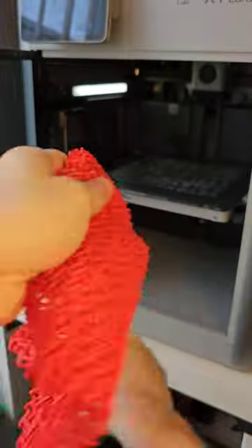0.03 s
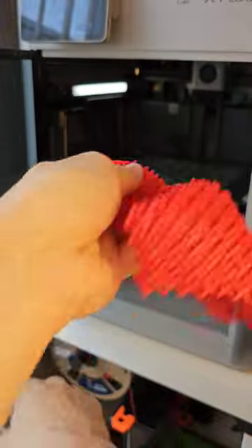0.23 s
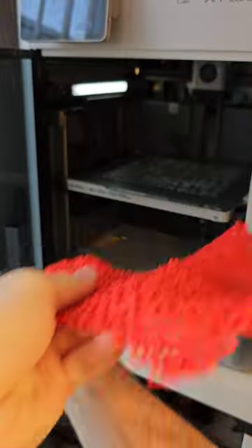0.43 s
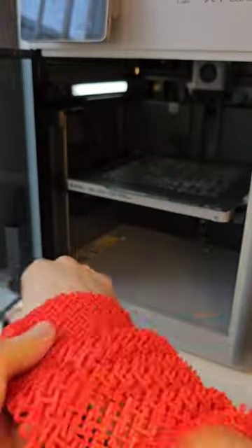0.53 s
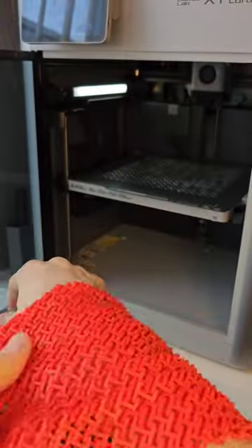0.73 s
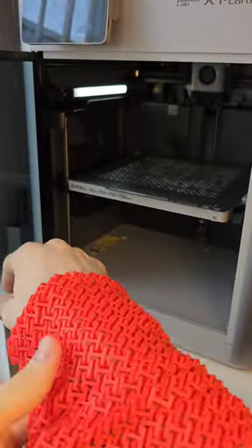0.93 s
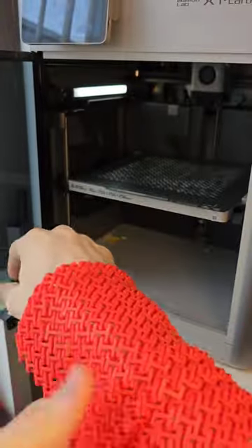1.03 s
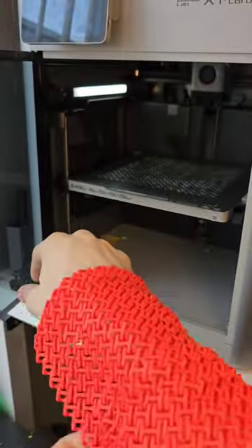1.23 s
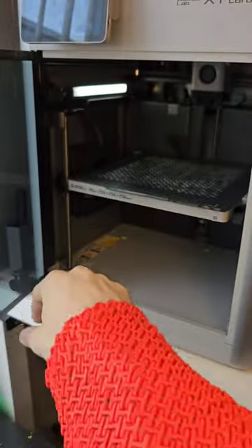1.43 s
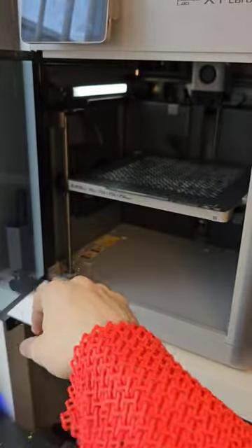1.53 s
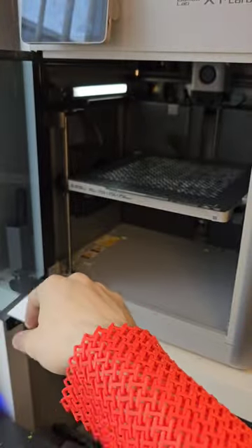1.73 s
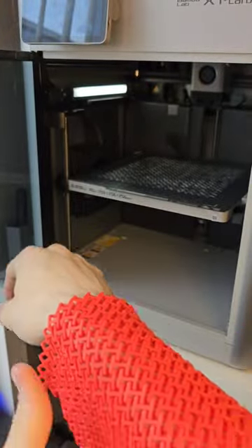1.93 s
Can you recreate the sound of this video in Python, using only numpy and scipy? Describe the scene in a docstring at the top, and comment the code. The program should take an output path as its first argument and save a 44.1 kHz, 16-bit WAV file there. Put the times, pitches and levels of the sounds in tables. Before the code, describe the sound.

A sheet of plastic chainmail rustles close to a stereo microphone, hundreds of tiny links clicking. It peaks in hard snaps, lulls, then returns in softer swishes and a last bright flick. A machine hums faintly in the small room.

```python
"""A sheet of plastic chainmail is lifted, tossed over a forearm and smoothed down, close to a stereo mic.
From the start, each move sets hundreds of small links clicking; now and then a few catch and snap free.
The rustle peaks in hard snaps near 0.6 s, lulls, then returns in softer swishes over dull arm rubs.
A last bright flick at 1.7 s dies away into the machine that hums faintly in the small room throughout."""
import sys
import numpy as np
from scipy import signal
from scipy.fft import rfft, irfft
from scipy.io import wavfile
from scipy.ndimage import map_coordinates

SR = 44100
rng = np.random.default_rng(int(sys.argv[2]) if len(sys.argv) > 2 else 0)


def digitize_waveform(pressure):
    """Quantize a signal to 16-bit integers and store it at the path in sys.argv[1].

    Rows of a 2-D input are taken as channels; values are limited to [-1, 1].
    """
    field = np.atleast_2d(pressure).T
    bounded = np.clip(field, -1, 1)
    quanta = np.round(bounded * 32767).astype(np.int16)
    wavfile.write(sys.argv[1], SR, quanta)


N = 88200

# tone colour of the fan's air: f/Hz, relative level/dB
FAN_COLOUR = [(20, -11.5), (45, -0.5), (75, -4), (110, -8), (200, 1.5), (320, -5.5), (480, -5), (680, -7),
              (900, -12), (1800, -18), (4000, -28.5), (8000, -26.5), (15000, -12)]
# how centred the air sounds: f/Hz, left-right correlation
FAN_CORRELATION = [(30, 0.65), (180, 0.87), (350, 0.9), (700, 0.12), (2000, 0.01), (15000, 0.22)]
# the machine's weaker tones: f/Hz, level/dB
MOTOR_TONES = [(80.7, -70), (118.4, -74.5), (226.1, -72.5), (409.1, -76), (511.4, -80), (694.4, -76)]
# level ride of the machine's main tone: t/s, level/dB
DRONE_RIDE = [(0.0, -68), (0.06, -80.5), (0.13, -77), (0.39, -60), (0.64, -61.5), (0.76, -73), (0.96, -60),
              (1.16, -69), (1.39, -59.5), (1.5, -69), (1.79, -59.5), (2.0, -60.5)]
# reverb time of the small room: f/Hz, T60/s
ROOM_DECAY = [(300, 0.23), (3000, 0.12), (8000, 0.2), (15000, 0.079)]
# echoes off nearby surfaces, relative to the direct sound: delay/s, left/dB, right/dB
EARLY_ECHOES = [(.0018, -10, -1), (.0031, -9, -11), (.0046, -2.5, -9.5)]
# soft rubs of the arm: peak t/s, half-width/s, level/dB, centre f/Hz
ARM_RUBS = [(.1, 0.044, -67.5, 238), (.335, 0.028, -83, 65), (0.924, 0.026, -61, 244),
            (1.004, 0.011, -56, 220), (1.075, 0.014, -70, 215), (1.15, .02, -62.5, 220),
            (1.262, 0.016, -59.5, 219), (1.52, 0.015, -65, 230), (1.65, 0.081, -63, 49.6),
            (1.98, 0.035, -58, 234)]
# tone of the clicks through the microphone, with its two high resonant peaks: f/Hz, left/dB, right/dB
CLICK_COLOUR = [(200, -45, -45), (800, -36, -36), (1300, -29, -29), (1800, -28.5, -27.5),
                (2200, -25, -22.5), (3000, -24, -20.5), (4200, -23, -21.5), (5100, -23, -26.5),
                (6600, -16.5, -17.5), (9300, -12, -21), (10400, -15.5, -16.5), (10750, -15, -13.5),
                (11150, -4.3, -5), (11480, 3.3, 4), (12000, -7.5, -9.5), (13000, -12, -17.5),
                (14300, -5.5, -8.5), (14900, -2.5, -9), (15300, 4.2, -2.5)]
# swishes of the sheet: peak t/s, rise/s, fall/s, level/dB, left over right/dB, clatter offset/dB
SWISH_CUES = [(.01, 0.13, 0.063, -35, 4.5, -2), (0.065, 0.029, 0.12, -34, 4, -3.5),
              (.125, 0.014, 0.093, -36.5, 3.5, 0.5), (0.246, 0.037, 0.042, -38, 4, 2),
              (0.293, 0.061, 0.057, -28.5, 5, -5), (0.375, 0.021, 0.038, -32, 6, -3.5),
              (0.486, 0.076, 0.055, -33.5, 5, -3.5), (0.554, 0.0094, 0.027, -23.5, 11, -1),
              (0.582, 0.034, 0.044, -20.5, 4, -1), (0.625, 0.02, 0.037, -22.5, 6, -6),
              (0.692, .03, 0.052, -40, 4.5, -1.5), (.89, 0.22, 0.17, -47, 3, 1.5),
              (1.055, 0.051, 0.073, -35.5, 4.5, 0), (1.104, 0.02, 0.02, -39.5, -4.5, 1.5),
              (1.174, 0.054, 0.012, -35.5, 11, -3.5), (1.224, 0.053, 0.016, -36.5, 3.5, 0),
              (1.274, 0.025, 0.031, -36, 3.5, -2), (1.309, 0.029, 0.033, -34, 3, -1),
              (1.393, 0.01, 0.0063, -46.5, 10, 7.5), (1.543, 0.059, 0.044, -40, 4.5, 1.5),
              (1.719, 0.087, 0.066, -38, 2.5, 1), (1.722, 0.024, 0.019, -24.5, 3, -16),
              (1.843, 0.08, 0.026, -41, 2.5, -4), (1.949, 0.17, 0.14, -63, 24, -45)]
# links snapping free: start t/s, level/dB, left over right/dB, clatter offset/dB
SNAP_CUES = [(.063, -36, -8, -3), (.125, -31, 4, -8), (0.147, -24, -3, -8), (0.153, -27, 7, -9),
             (.231, -37.5, 8, 2), (.298, -24, 2, -8), (0.366, -22, 13, -2), (0.3743, -25, 12, -6),
             (0.485, -29, 4, 6), (.525, -43, 4, -7), (0.554, -14, 5, -1), (.5657, -14, 6, -1),
             (0.571, -19, 6, 0), (0.5834, -16, 11, -4), (.7095, -39, 4, -7), (.937, -51, 14, -3),
             (1.008, -46, 4, 1), (1.0437, -33.5, -2, -8), (1.067, -32, -4, -11), (1.157, -32, -11, 0),
             (1.168, -37, 8, -9), (1.174, -36, 16, -6), (1.207, -28, -13, -17), (1.214, -38, -12, -5),
             (1.226, -36, 8, -6), (1.274, -29, 7, -2), (1.31, -36, -7, -2), (1.3217, -35, -7, -12),
             (1.392, -29, -11, -3), (1.4025, -26.5, 8.5, -4), (1.406, -51, 4, -6), (1.7166, -27, -10, -10),
             (1.7207, -32, -4, -21), (1.727, -30.5, -17, -12), (1.756, -31, -3, -12), (1.838, -38, 9, -9),
             (1.855, -44, -2, -6)]

BUSY_DB = -38.5  # swish level at which clicks and rattles run at their nominal rates
LOW_PAN_DB = 2.5  # hum, drone and rubs sit a little left
TIME, FREQS = np.arange(N) / SR, np.fft.rfftfreq(N, 1 / SR)


def amp(db):
    """Decibels to gain."""
    return 10 ** (np.asarray(db) / 20)


def unit(x):
    """Scales to rms 1."""
    return x / np.sqrt(np.mean(x ** 2) + 1e-20)


def curve(points, hz, column=1):
    """Reads one column of a table on a log-frequency axis."""
    table = np.transpose(points)
    return np.interp(np.log(hz + 1), np.log(table[0]), table[column])


def pan(db):
    """Constant-power stereo gains; positive is left."""
    gains = amp(np.array([db, -db]).reshape(2, -1) / 2)
    return gains / np.sqrt((gains ** 2).mean(0))


def convolve(x, response):
    """Passes each channel through its response."""
    return signal.fftconvolve(x, response, axes=1)[:, :N]


def wander(rate_hz):
    """Slow random drift, about rms 1."""
    hz = np.fft.rfftfreq(2 * N, 1 / SR)
    return unit(irfft(rfft(rng.standard_normal(2 * N)) / (1 + (hz / rate_hz) ** 4)))[:N]


def add(mix, at, sound):
    """Mixes a stereo sound in at a sample position."""
    part = mix[:, at:at + sound.shape[1]]
    part += sound[:, :part.shape[1]]


def fan_air(level_db=-56.5, pan_db=0.5):
    """A steady bed of fan noise, centred in the lows and wide in the highs."""
    left, independent = rfft(rng.standard_normal((2, N)))
    shared = curve(FAN_CORRELATION, FREQS)
    right = shared * left + np.sqrt(1 - shared ** 2) * independent
    air = irfft(np.array([left, right]) * amp(curve(FAN_COLOUR, FREQS)), N)
    return amp(level_db) * pan(pan_db) * unit(air)


def motor_hum(waver_depth=0.2, waver_hz=1.76):
    """Faint motor tones, each wavering in level and phase."""
    hum = np.zeros(N)
    for hz, db in MOTOR_TONES:
        tremolo = 1 + waver_depth * wander(waver_hz)
        hum += amp(db) * unit(tremolo * np.sin(2 * np.pi * hz * TIME + wander(waver_hz)))
    return pan(LOW_PAN_DB) * hum


def machine_drone(hz=150.3):
    """The machine's main tone swells and fades at a steady pitch."""
    ride_db = np.interp(TIME, *np.transpose(DRONE_RIDE))
    tone = np.sin(2 * np.pi * (hz * TIME + rng.random()))
    return amp(ride_db) * pan(LOW_PAN_DB) * unit(tone)


def room_tail(x, wet_db=-3.5, patterns=7, predelay_s=0.004):
    """A short diffuse reverb; crossfading between tails shifts its pattern as the sheet moves."""
    wet, position = np.zeros((2, N)), np.linspace(0, patterns - 1, N)
    for k in range(patterns):
        hz, t, noise = signal.stft(rng.standard_normal((2, SR // 2)), SR, nperseg=256)
        decay = amp(-60 * t / curve(ROOM_DECAY, hz)[:, None]) * (t > predelay_s)
        tail = signal.istft(noise * decay, SR, nperseg=256)[1]
        send = np.sqrt(np.maximum(1 - abs(position - k), 0))
        wet += convolve(x * send, tail / np.linalg.norm(tail[0]))
    return amp(wet_db) * wet


def with_echoes(x, drift_depth=0.061, drift_hz=1):
    """Nearby surfaces hollow the rustle with quick echoes whose paths drift as the arm moves."""
    mix, power = x, 1
    for delay_s, left_db, right_db in EARLY_ECHOES:
        gain = amp([[left_db], [right_db]])
        at = np.arange(N) - delay_s * SR * (1 + drift_depth * wander(drift_hz))
        echo = np.array([map_coordinates(side, [at], order=5) for side in x])
        mix, power = mix + gain * echo, power + gain ** 2
    return mix / np.sqrt(power)


def arm_rubs(half_width_octaves=0.45):
    """Soft, dull swells of noise from the arm moving under the sheet."""
    rubs = np.zeros(N)
    for peak, width, db, centre_hz in ARM_RUBS:
        band = np.exp(-(np.log2((FREQS + 1) / centre_hz) / half_width_octaves) ** 2)
        noise = irfft(rfft(rng.standard_normal(N)) * band, N)
        rubs += amp(db) * np.exp(-((TIME - peak) / width) ** 2) * unit(noise)
    return pan(LOW_PAN_DB) * rubs


def sheet_movement(rest_db=-62.5, rest_pan_db=4):
    """Power envelopes of the bright sizzle and the lower clatter as the swishes come and go."""
    sizzle_power = clatter_power = (amp(rest_db) * pan(rest_pan_db)) ** 2 * np.ones(N)
    for peak, rise, fall, db, pan_db, clatter_db in SWISH_CUES:
        from_peak = (TIME - peak) / np.where(TIME < peak, rise, fall)
        swish = (amp(db) * pan(pan_db) * np.exp(-from_peak ** 2)) ** 2
        sizzle_power = sizzle_power + swish
        clatter_power = clatter_power + swish * amp(clatter_db) ** 2
    return sizzle_power, clatter_power


def click_colour(x):
    """Gives clicks their bright tone, with the microphone's sharp resonances near 11.5 and 15.3 kHz."""
    hz = abs(np.fft.fftfreq(2048, 1 / SR))
    log_gain = np.log(amp([curve(CLICK_COLOUR, hz, column=1), curve(CLICK_COLOUR, hz, column=2)]))
    response = np.fft.ifft(np.exp(np.conj(signal.hilbert(log_gain)))).real  # minimum phase: crisp attack
    return convolve(x, response / np.linalg.norm(response, axis=1, keepdims=True))


def clatter_band(x, crossover_hz=8900):
    """The body of the clicks, below their sizzle."""
    return irfft(rfft(x) / (1 + (FREQS / crossover_hz) ** 12), N)


def link_rattle(clatter_power, per_s=1100, low_hz=2150, high_hz=8600, relative_db=-21):
    """Loose links ping for a few milliseconds, each at its own pitch, denser in the swishes."""
    rise_s, mid_decay_s, spread_db = 0.0012, 0.0048, 1.6
    t, pings = np.arange(1024) / SR, np.zeros((2, N))
    rate = per_s * (np.sqrt(clatter_power.mean(0)) / amp(BUSY_DB)) ** 0.35
    chance, pitch, damping = rng.random((3, N))
    phase = rng.random((2, N))
    strength = amp(spread_db * np.minimum(rng.exponential(1, N), 3)) / np.sqrt(rate)
    for at in np.flatnonzero(chance < rate / SR):
        hz = low_hz + (high_hz - low_hz) * pitch[at]
        envelope = np.exp(-t * (0.5 + damping[at]) / mid_decay_s) * (1 - np.exp(-t / rise_s))
        add(pings, at, strength[at] * envelope * np.sin(2 * np.pi * (hz * t + phase[:, at, None])))
    return amp(relative_db) * unit(pings) * np.sqrt(clatter_power)


def click_palette(kinds, decay_s=0.00024):
    """One tiny stereo noise burst for each kind of link, whitened to a neutral tone."""
    t = np.arange(256) / SR
    bursts = rng.standard_normal((kinds, 2, 256)) * t ** 2 * np.exp(-t / decay_s)
    spectra = rfft(bursts, 512)
    return irfft(spectra / np.sqrt((abs(spectra) ** 2).mean(0)))[..., :256]


def link_rustle(sizzle_power, clatter_power, per_s=2800, spread_db=4, scatter_db=1, kinds=64):
    """Links collide at random, faster and harder as the sheet moves."""
    rate = per_s * (np.sqrt(sizzle_power.mean(0)) / amp(BUSY_DB)) ** 0.56
    # dividing by the root of the rate leaves loudness to the envelopes
    strength = amp(spread_db * np.minimum(rng.exponential(1, N), 3.5)) / np.sqrt(rate)
    hits = (rng.random(N) < rate / SR) * strength * pan(-scatter_db * rng.standard_normal(N))
    kind = rng.integers(0, kinds, N)
    palette, clicks = click_palette(kinds), np.zeros((2, N))
    for at in np.flatnonzero(hits[0]):
        add(clicks, at, hits[:, at, None] * palette[kind[at]])
    clicks = unit(click_colour(clicks))
    clatter = clatter_band(clicks)
    return (clicks - clatter) * np.sqrt(sizzle_power) + clatter * np.sqrt(clatter_power)


def link_snaps(peak_s=0.002, half_width_s=0.0017, shake_peak_s=0.005, shake_db=-19):
    """A cluster of caught links lets go within a few milliseconds and shakes its neighbours."""
    sizzle_gain, clatter_gain = np.zeros((2, N)), np.zeros((2, N))
    for start, db, pan_db, clatter_db in SNAP_CUES:
        crack = np.exp(-((TIME - start - peak_s) / half_width_s) ** 2)
        age = np.maximum(TIME - start, 0) / shake_peak_s
        shake = amp(shake_db) * (age * np.exp(1 - age)) ** 2
        envelope = amp(db) * pan(pan_db) * np.hypot(crack, shake)
        sizzle_gain = np.hypot(sizzle_gain, envelope)
        clatter_gain = np.hypot(clatter_gain, envelope * amp(clatter_db))
    noise = click_colour(rng.standard_normal((2, N)))
    clatter = clatter_band(noise)
    return (noise - clatter) * sizzle_gain + clatter * clatter_gain


def scene():
    """The chainmail up front in its room, with the machine behind."""
    sizzle_power, clatter_power = sheet_movement()
    rustle = with_echoes(link_rustle(sizzle_power, clatter_power))
    sheet = rustle + link_rattle(clatter_power) + link_snaps()
    return sheet + room_tail(sheet) + arm_rubs() + motor_hum() + fan_air() + machine_drone()


def record(dry, cutoff_hz=15520):
    """A steep high cut trims the very top of the mix."""
    lowpass = signal.firwin(511, cutoff_hz, window=("kaiser", 9), fs=SR)
    return signal.oaconvolve(dry, lowpass[None], "same")


dry = scene()
out = record(dry)
digitize_waveform(out)
```